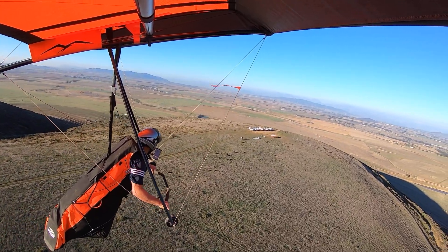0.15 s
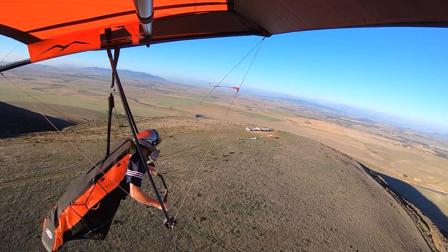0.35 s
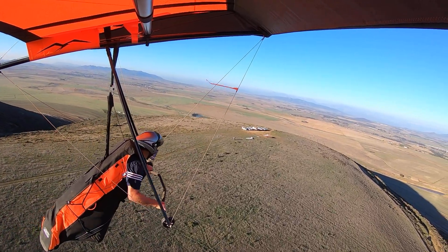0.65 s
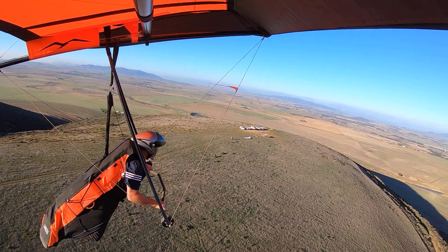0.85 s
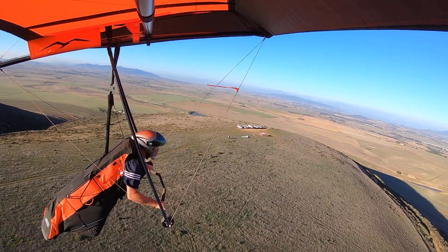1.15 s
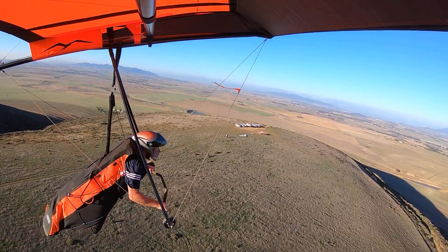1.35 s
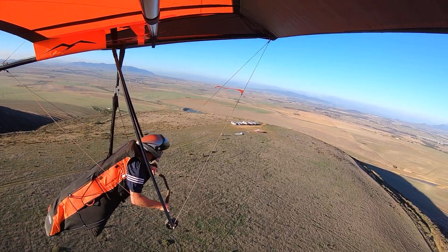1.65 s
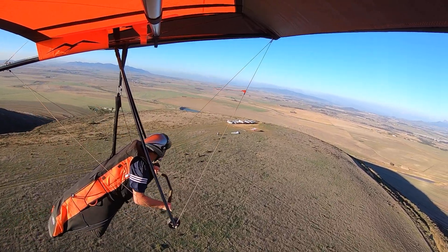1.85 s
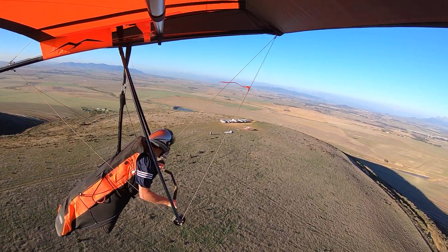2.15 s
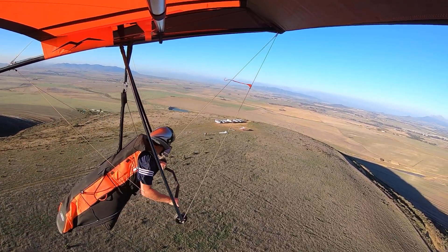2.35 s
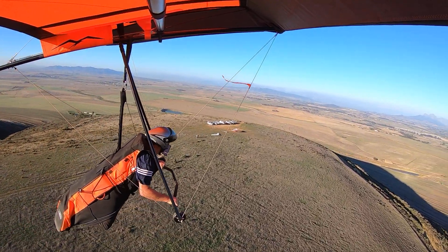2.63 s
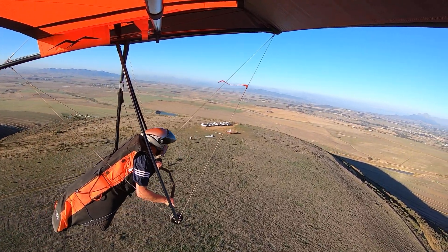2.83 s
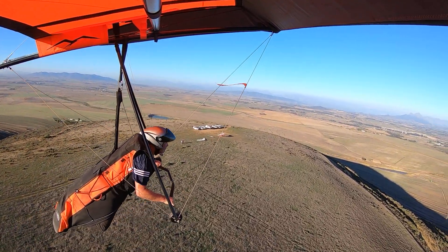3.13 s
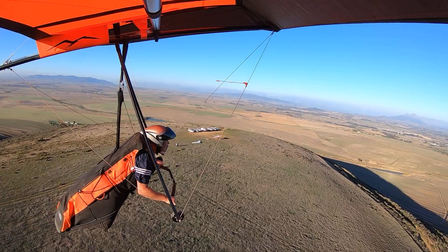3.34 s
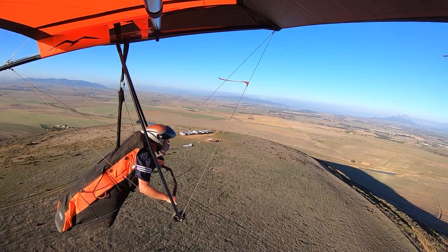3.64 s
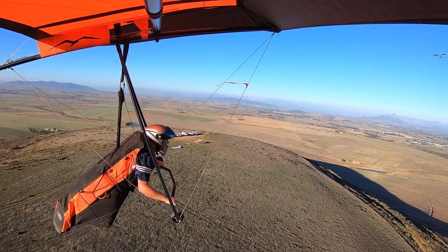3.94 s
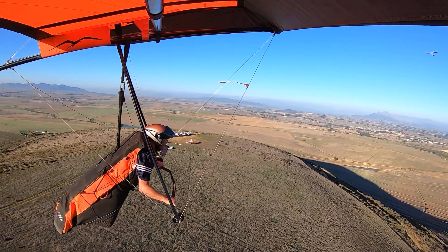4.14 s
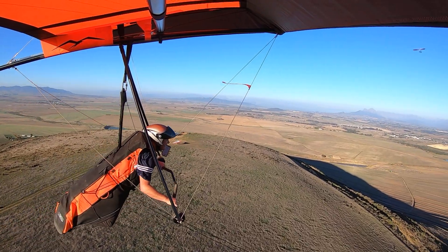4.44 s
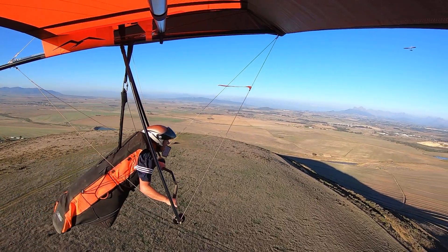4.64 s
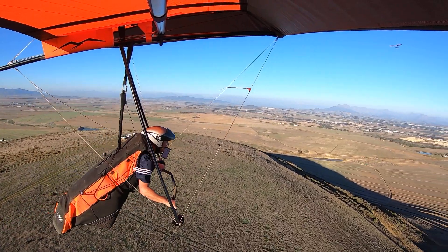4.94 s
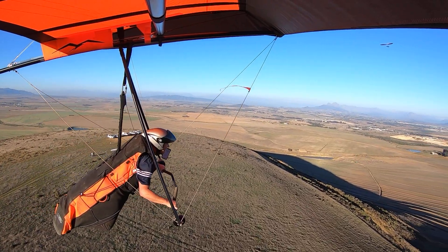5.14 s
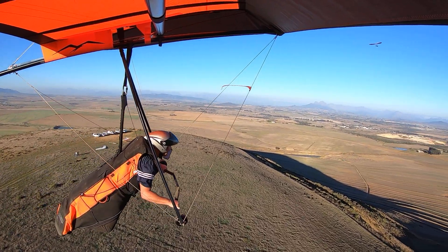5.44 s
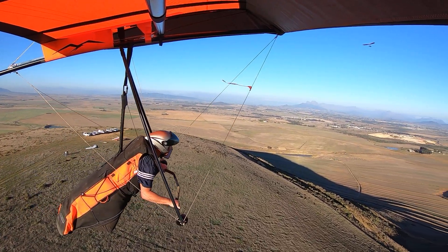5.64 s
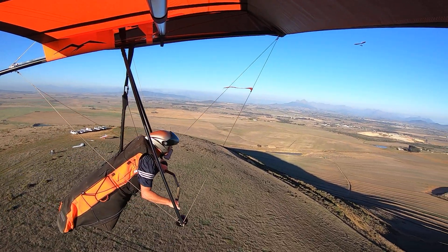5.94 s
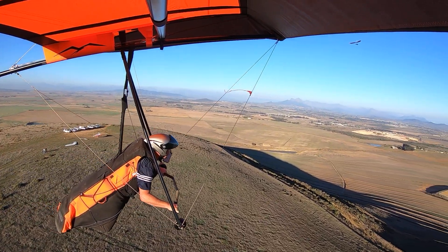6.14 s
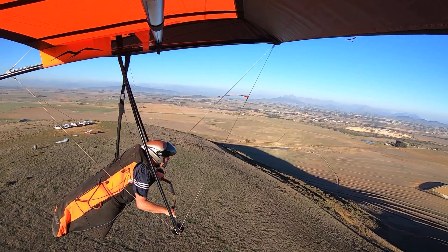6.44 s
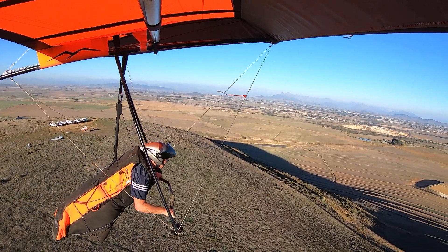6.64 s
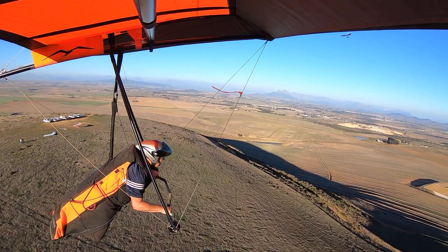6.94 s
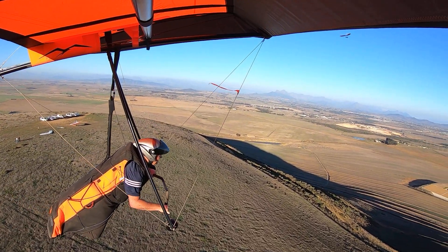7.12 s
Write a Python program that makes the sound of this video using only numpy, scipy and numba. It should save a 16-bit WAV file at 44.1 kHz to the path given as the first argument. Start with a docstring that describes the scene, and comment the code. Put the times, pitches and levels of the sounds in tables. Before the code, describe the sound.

Gusty airflow buffets a camera microphone in gliding flight, deep and uneven, over soft sail hiss, fine crackle and short wavering hoots.

```python
"""Wind rumbles and thumps over the microphone port of a small camera fixed to a hang glider's wing.
Large eddies make the rumble; smaller ones buffet and ripple in gusts: coloured noise with flickering bands.
The thin port cover flutters into short wavering hoots and one groan: four gliding partials.
A rigging wire sings: a sine plus narrow-band noise. The sail hisses and crackles: noise and soft ticks.
Brief treble rustles stand out: enveloped noise bands."""
import sys
import numpy as np
from scipy import signal
from scipy.fft import rfft, irfft
from scipy.io import wavfile
from scipy.ndimage import uniform_filter1d, map_coordinates
from numba import njit

SR = 44100
rng = np.random.default_rng(int(sys.argv[2]) if len(sys.argv) > 2 else 0)


def int16_out(signal):
    """Quantize to a 16-bit WAV file."""
    q = np.round(np.clip(np.atleast_2d(signal).T, -1, 1) * 32767)
    wavfile.write(sys.argv[1], SR, q.astype(np.int16))


N = 321048


def undb(db):
    """Decibels to amplitude gain."""
    return 10 ** (np.asarray(db) / 20)


def unit(x):
    """Scale to rms 1."""
    return x / np.sqrt(np.mean(x ** 2))


def columns(table):
    """Curve columns, interpolated linearly to one value per sample."""
    time_s, *curves = np.transpose(table)
    return [np.interp(np.arange(N) / SR, time_s, curve) for curve in curves]


@njit
def svf(x, centre_hz, width_hz):
    """State-variable band-pass with a moving centre, gain 1 there."""
    y, band, low = np.empty(len(x)), 0., 0.
    for i in range(len(x)):
        g = np.tan(np.pi * centre_hz[i] / SR)
        damping = width_hz / centre_hz[i]
        v = (band + g * (x[i] - low)) / (1 + g * (g + damping))
        band, low = 2 * v - band, low + 2 * g * v
        y[i] = damping * v
    return y


def walk(rate_hz):
    """Random levels held 1 / rate_hz, slewed by two moving averages; spread near 1."""
    hold = int(SR / rate_hz)
    steps = np.repeat(rng.standard_normal(N // hold + 1), hold)
    return 1.249 * uniform_filter1d(uniform_filter1d(steps, hold), hold)[:N]


def turbulence(spectrum, together_db, alone_db, rate_hz):
    """Coloured noise, rms 1, in overlapping octave bands that flicker together and each alone."""
    hz, density_db = np.transpose(spectrum)
    octave = np.log2(np.maximum(np.arange(N // 2 + 1) * SR / N, 1))
    colour_db = np.interp(octave, np.log2(hz), density_db, left=-90, right=-90)
    noise = rfft(rng.standard_normal(N)) * undb(colour_db)
    out = 0
    for centre in np.arange(np.floor(np.log2(hz[0])), np.log2(hz[-1]) + 1):
        share = np.clip(1 - np.abs(octave - centre), 0, 1)
        out = out + irfft(noise * share, N) * undb(alone_db * walk(rate_hz))
    return unit(out * undb(together_db))


def swells(times_s, rise_db, half_width_s):
    """Bell-shaped level changes, summed in dB; half-width at 1/e."""
    t = np.arange(N) / SR
    events = np.broadcast(times_s, rise_db, half_width_s)
    return sum(db * np.exp(-((t - at) / width) ** 2) for at, db, width in events)


# large eddies, base levels: (time [s], rumble level [dB], buffet level [dB])
EDDIES = [(0.0, -21, -30), (0.28, -25, -35.5), (0.65, -15.5, -36), (0.79, -26, -29), (0.95, -22.5, -29.5),
          (1.5, -27, -38), (1.76, -18, -30), (1.86, -23.5, -33.5), (2.68, -18, -30.5), (3.16, -22.5, -31.5),
          (3.4, -25, -30.5), (3.55, -17.5, -32.5), (4.03, -23.5, -37), (4.46, -20, -31.5),
          (5.01, -25.5, -29), (5.61, -17, -27), (5.86, -19.5, -26), (6.26, -19, -29), (7.28, -18, -28.5)]
# gusts of small eddies: (time [s], base ripple level [dB], relative sweep speed [ratio])
GUSTS = [(0, -41.5, 1.05), (.45, -45.5, 0.87), (.67, -44, 0.94), (1.09, -42, 0.94), (1.25, -47.5, 0.97),
         (2.28, -45, 0.81), (2.42, -42.5, 1.15), (2.86, -39, 1.15), (2.94, -47, 0.79), (4.44, -45, 0.74),
         (4.54, -38, .7), (4.86, -36.5, 0.82), (4.96, -39, 0.86), (5.13, -35, 0.91), (5.47, -39, 1.05),
         (5.72, -37.5, 1.1), (5.79, -47, 0.77), (5.98, -47, 1.15), (6.14, -45, 0.74), (6.95, -43.5, 0.83),
         (7.06, -34.5, 0.91), (7.28, -33.5, 1.23)]
# single eddies striking the port: (time [s], rumble change [dB], buffet change [dB])
THUMPS = [(0.14, 11.5, -3), (.643, 1, 10.5), (.98, 7, 3), (1.377, 4.5, 10.5), (1.763, -2.5, 3),
          (2.554, -4, 3), (2.842, 3.5, 5.5), (3.08, 9.5, -4), (3.649, -7, 4.5), (4.118, 8, 2),
          (4.869, 10, 0), (5.575, 4.5, -5), (5.983, 5, 8.5), (6.185, 2, 3.5), (6.781, 0.5, 4),
          (7.06, 1.5, 5)]
# bursts of small eddies: (time [s], ripple rise [dB], half-width [s])
BURSTS = [(1.38, 7.5, 0.0089), (1.769, 1.5, 0.014), (2.18, 13.5, 0.019), (2.34, 7, 0.019),
          (2.439, 3.5, 0.026), (2.8, 3, .02), (2.865, 3.5, .012), (3.01, 13.5, 0.02), (3.075, 13, 0.011),
          (3.175, 7, 0.014), (3.321, 10, 0.076), (3.46, 6, 0.028), (3.845, 8.5, 0.02), (5, 8.5, 0.022),
          (5.9, 7, 0.052), (5.98, 15, 0.056), (6.105, 13.5, 0.027)]
# lulls between eddies, negative = rise: (time [s], rumble dip [dB], buffet dip [dB], ripple dip [dB])
LULLS = [(1.51, 3, -2.5, -1), (2.301, 1.5, 10.5, -3), (2.73, 13.5, -4, 0), (3.575, 10.5, 6, 3),
         (3.707, 8, 4, -1.5), (4.015, 1.5, 4, 2), (4.74, -2, 3.5, 3), (4.928, 1, 6.5, -1),
         (5.45, 7.5, 6, 0.5), (6.05, 3, -2.5, -0.5), (6.6, 3.5, 2.5, 7)]
# relative noise spectra of the eddies: (frequency [Hz], density [dB per Hz])
RUMBLE = [(15, -17), (30, 0.5), (65, 2), (100, -1), (160, -8), (250, -25.5), (400, -39)]
BUFFET = [(100, -13.5), (170, 5.5), (250, 1.5), (350, -5.5), (480, -13), (700, -22.5)]
# the same, before the sweep speed shifts them
RIPPLE = [(300, -2.5), (500, 0), (700, -3.5), (950, -9.5), (1200, -16.5), (1900, -30), (2800, -49)]
ROAR = [(450, -19.5), (700, 2.5), (900, -2.5), (1100, -9.5), (1600, -15.5), (2400, -33)]
THUMP_HALF_S, LULL_HALF_S = 0.025, 0.04
# whirl centre at sweep speed 1; level re ripple
WHIRL_HZ, WHIRL_WIDTH_HZ, WHIRL_DB = 617, 120., -8
# roar is ROAR_DB at ripple level ROAR_FROM_DB; slope in dB per dB
ROAR_FROM_DB, ROAR_DB, ROAR_SLOPE = -35.5, -41.5, 1.18


def port():
    """Big eddies rumble; small ones flicker faster, brighten with sweep speed and moan as whirls."""
    rumble_db, buffet_db = columns(EDDIES)
    ripple_db, sweep = columns(GUSTS)

    thump_s, rumble_rise_db, buffet_rise_db = np.transpose(THUMPS)
    lull_s, rumble_dip_db, buffet_dip_db, ripple_dip_db = np.transpose(LULLS)
    rumble_db = rumble_db + swells(thump_s, rumble_rise_db, THUMP_HALF_S)
    rumble_db = rumble_db - swells(lull_s, rumble_dip_db, LULL_HALF_S)
    buffet_db = buffet_db + swells(thump_s, buffet_rise_db, THUMP_HALF_S)
    buffet_db = buffet_db - swells(lull_s, buffet_dip_db, LULL_HALF_S)
    ripple_db = ripple_db + swells(*np.transpose(BURSTS))
    ripple_db = ripple_db - swells(lull_s, ripple_dip_db, LULL_HALF_S)

    rumble = turbulence(RUMBLE, 1.2 * walk(26), alone_db=0.65, rate_hz=18)
    buffet = turbulence(BUFFET, 1.1 * walk(30), alone_db=2.5, rate_hz=32)
    ripple = turbulence(RIPPLE, 2.4 * walk(70), alone_db=-0.5, rate_hz=72)
    roar = turbulence(ROAR, 1.6 * walk(40), alone_db=2.0, rate_hz=28)

    # read at the sweep speed: faster is brighter
    position = np.cumsum(sweep)
    ripple = map_coordinates(ripple, [position], mode="mirror")
    roar = map_coordinates(roar, [position], mode="mirror")

    whirl = rng.standard_normal(N)
    whirl_hz = WHIRL_HZ * sweep * np.exp(.25 * walk(16))
    for _ in range(3):
        whirl = svf(whirl, whirl_hz, WHIRL_WIDTH_HZ)
    ripple = ripple + undb(WHIRL_DB) * unit(whirl * undb(1.5 * walk(30)))

    # strong gusts brighten
    roar_db = ROAR_DB + ROAR_SLOPE * (ripple_db - ROAR_FROM_DB)
    low = undb(rumble_db) * rumble + undb(buffet_db) * buffet
    return low + undb(ripple_db) * ripple + undb(roar_db) * roar


# hoots, pitch and levels before bend, wobble and shake: (start [s], length [s], flutter [Hz],
# glide [Hz per s], fundamental level [dB], second partial level [dB], third partial level [dB])
HOOTS = [(0.039, 0.025, 372, 1006, -33, -57, -69), (0.1, 0.11, 324.7, 301, -47, -30.5, -42),
         (0.207, 0.034, 377, -1400, -31.5, -51, -64), (0.267, 0.054, 331.6, -150, -39, -29, -38.5),
         (0.467, 0.076, 291, 412, -50, -38, -76), (.79, 0.06, 236, -200, -26, -53, -69),
         (0.902, 0.053, 232.4, 501, -25.5, -57, -69), (1.045, 0.057, 242, -300, -27.5, -62, -73),
         (1.573, 0.0594, 291.5, -1000, -51, -31.5, -51), (1.612, 0.036, 355, -1300, -30, -57, -70),
         (1.653, 0.026, 368, 1503, -29, -54, -66), (1.757, 0.023, 422, 2500, -28.5, -55, -66),
         (1.799, 0.035, 356, -400, -28, -62, -68), (2.117, 0.016, 331, -300, -24, -53, -66),
         (2.257, 0.022, 328, -3, -27.5, -63, -72), (2.526, 0.034, 277, -4, -26.5, -33, -43.5),
         (2.994, 0.032, 418, 206, -26, -46, -62), (3.426, 0.054, 353, 1402, -29.5, -49, -63),
         (3.626, 0.038, 355, 1, -32.5, -60, -83), (3.894, 0.023, 405.3, -1400, -26, -61, -71),
         (3.941, 0.046, 361.4, -300, -32, -63, -66), (3.983, 0.032, 368, 300, -31, -61, -66),
         (4.866, 0.034, 403, 5, -27, -65, -67), (5.51, 0.075, 293, -300, -49, -31.5, -58),
         (5.58, 0.046, 313, 1201, -51, -41, -49)]
# groan pitch before wobble: (time [s], flutter [Hz])
GROAN = [(3.14, 364), (3.185, 394.4), (3.205, 331), (3.238, 303.6), (3.27, 380.4), (3.297, 408),
         (3.322, 335), (3.348, 367.2), (3.366, 313), (3.385, 357), (3.41, 352)]
# groan levels before shake: (fundamental [dB], second partial [dB], third partial [dB])
GROAN_PARTIALS_DB = (-28, -48.5, -65)
GROAN_EDGE_S = 0.032
ARCH = .09  # share by which pitch is lower where the swing starts and dies


def cover(wobble=0.025, fourth_db=-7, rocking=0.26):
    """A slack membrane swings unevenly, in short hoots and one long groan."""
    out = np.zeros(N)
    drift = wobble * walk(70)
    # turbulence rocks the swing, smearing each partial into a band
    shake = undb(0.97 * walk(50)) * (1 + rocking * walk(180))

    def add(start_s, hz, swing, partials_db):
        """Add one stretch of flutter; the fourth partial follows the third."""
        start = int(start_s * SR)
        span = slice(start, start + len(hz))
        phase = 2 * np.pi * np.cumsum(hz * (1 + drift[span])) / SR
        levels_db = [*partials_db, partials_db[-1] + fourth_db]
        for partial, db in enumerate(levels_db, 1):
            out[span] += swing * undb(db) * np.sin(partial * phase)

    for start_s, length_s, flutter_hz, glide_hz_per_s, *partials_db in HOOTS:
        t = np.arange(int(length_s * SR)) / SR
        arch = np.sin(np.pi * t / length_s)
        hz = flutter_hz + glide_hz_per_s * (t - length_s / 2)
        add(start_s, hz * (1 - ARCH * (1 - arch)), arch ** 1.08, partials_db)

    t = np.arange(GROAN[0][0], GROAN[-1][0], 1 / SR)
    gate = np.clip(np.minimum(t - t[0], t[-1] - t) / GROAN_EDGE_S, 0, 1)
    add(t[0], np.interp(t, *np.transpose(GROAN)), gate, GROAN_PARTIALS_DB)
    return np.sqrt(2) * shake * out  # sine peak to rms


# airflow past the wing: (time [s], mean wire tone [Hz], wire tone level [dB], sail hiss level [dB])
AIRFLOW = [(0, 1223, -48, -50), (.4, 1189, -52.5, -49.5), (.85, 1114, -48, -51), (1.3, 1143, -49, -50.5),
           (1.7, 1176, -47.5, -49), (2.12, 1145, -49.5, -51.5), (2.88, 1228, -51, -50.5),
           (2.96, 1150, -55, -49.5), (3.1, 1161, -47.5, -52), (3.9, 1132, -48.5, -51.5),
           (4.1, 1120, -48.5, -51.5), (4.7, 1163, -50.5, -51), (5.1, 1189, -49.5, -49.5),
           (5.6, 1212, -48, -48), (5.82, 1220, -49.5, -52), (5.96, 1235, -51, -47.5),
           (6.28, 1306, -50, -46), (6.6, 1255, -52.5, -44.5), (7.28, 1282, -47, -46)]
# relative noise spectra of hiss, sizzle and high rush: (frequency [Hz], density [dB per Hz])
HISS = [(410, -30.5), (700, -10.5), (1000, -7.5), (1600, -7.5), (1900, -13.5), (2400, -16), (3300, -16),
        (4600, -19.5), (5420, -29), (7400, -37.5), (8380, -49.5), (10900, -50), (13000, -65.5)]
SIZZLE = [(3500, -11), (4600, 3.5), (5500, -2.5), (7500, -6), (8300, -15.5), (10500, -22.5), (12500, -34.5)]
EDGE = [(8200, -14.5), (9500, -6), (10700, 5.5), (11500, -7.5), (14000, -22.5)]
TICK_DB = -8.5  # crackle re sizzle


def wing(sizzle_db=-15, edge_db=-82, edge_from_hz=1255, edge_db_per_hz=0.66):
    """The sail hisses in quick puffs; vortices leave the wire at a rate set by the airspeed."""
    wire_hz, wire_db, hiss_db = columns(AIRFLOW)
    puffs_db = 0.31 * walk(21) + 0.87 * walk(60)
    hiss = turbulence(HISS, 1.3 * puffs_db, alone_db=0.5, rate_hz=42)
    sizzle = turbulence(SIZZLE, 1.0 * puffs_db, alone_db=3.0, rate_hz=36)
    fine = sizzle + undb(TICK_DB) * crackle()
    sail = undb(hiss_db) * (hiss + undb(sizzle_db) * fine)

    # irregular shedding: narrow-band noise rides on the tone
    tone = np.sin(2 * np.pi * np.cumsum(wire_hz + 16 * walk(45)) / SR)
    slip = svf(svf(rng.standard_normal(N), wire_hz, 60.), wire_hz, 82.0)
    flicker_db = 1.5 * walk(55) + 0.8 * walk(20)
    shed = (0.85 * unit(tone) + unit(slip)) * undb(flicker_db)
    wire = undb(wire_db) * unit(shed)

    # thin high rush at the fastest airspeed; its level stops rising 5 Hz above edge_from_hz
    rush = turbulence(EDGE, 1.5 * walk(18), alone_db=-0.5, rate_hz=30)
    rush_db = edge_db + edge_db_per_hz * np.minimum(wire_hz - edge_from_hz, 5)
    return sail + wire + undb(rush_db) * rush


# relative noise spectrum inside the ticks: (frequency [Hz], density [dB per Hz])
CRACKLE = [(4800, -28), (5600, -5), (6800, -1), (7800, -3), (8600, -21.5), (11000, -43)]
TICKS_PER_S, TICK_S, TICK_SCATTER_DB = 140, 0.001, 1.5  # mean rate, time to peak, spread


def crackle():
    """Fine crackle of the sail: random soft noise ticks of a few milliseconds, uneven in level."""
    hits = rng.random(N) < TICKS_PER_S / SR
    starts = hits * undb(TICK_SCATTER_DB * rng.standard_normal(N))
    t = np.arange(SR // 40) / SR
    tick = t / TICK_S * np.exp(-t / TICK_S)
    envelope = signal.fftconvolve(starts, tick)[:N]
    return unit(turbulence(CRACKLE, 0, alone_db=0.0, rate_hz=26) * envelope)


# treble rustles: (time [s], level before envelope [dB], centre [Hz], fade time constant [s])
RUSTLES = [(1.71, -34, 6540, 0.0049), (2.429, -38, 5500, 0.0085), (3.07, -32, 4000, 0.013),
           (4.77, -35, 6000, 0.0054), (5.599, -34, 6100, 0.0066), (6.3, -27, 6040, 0.0055)]


def rustles(rise_s=0.031, width_hz=2800.0):
    """Brief broad puffs of noise, perhaps sailcloth creasing."""
    out, size = np.zeros(N), SR // 10
    t = np.arange(size) / SR
    for start_s, level_db, centre_hz, fade_s in RUSTLES:
        band = rng.standard_normal(size)
        for _ in range(3):
            band = svf(band, np.full(size, 1. * centre_hz), width_hz)
        envelope = (1 - np.exp(-t / rise_s)) * np.exp(-t / fade_s)
        out[int(start_s * SR):][:size] += undb(level_db) * unit(band) * envelope
    return out


def scene():
    """Sum of all sources at one microphone in open air."""
    return (port() + cover() + wing() + rustles())[None]


TOP_HZ = 15600


def record(dry):
    """The capsule rounds the strongest thumps; a low-pass, started settled, cuts the top."""
    rounded = np.tanh(1.377 * dry) / 1.462
    cut = signal.ellip(8, .2, 70, TOP_HZ, fs=SR, output="sos")
    settled = signal.sosfilt_zi(cut)[:, None] * rounded[None, :, :1]
    return signal.sosfilt(cut, rounded, zi=settled)[0]


dry = scene()
out = record(dry)
int16_out(out)
```